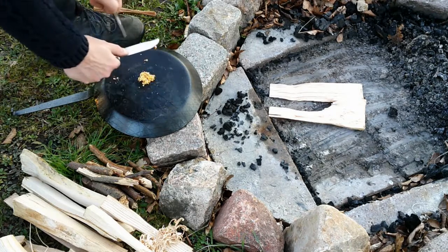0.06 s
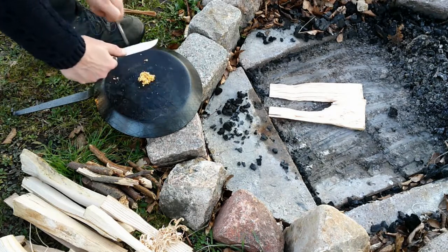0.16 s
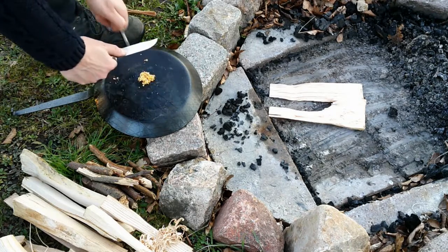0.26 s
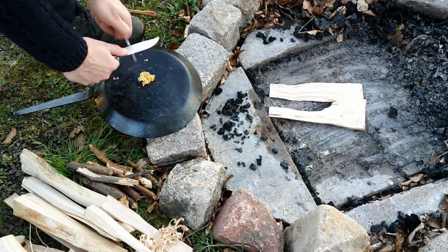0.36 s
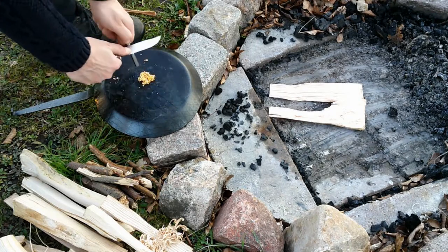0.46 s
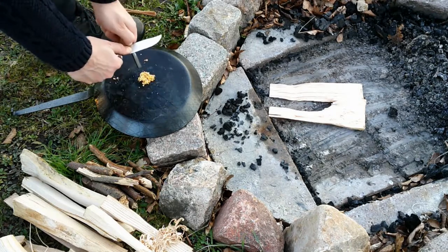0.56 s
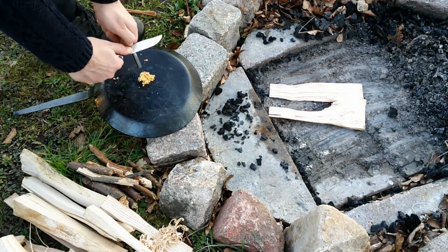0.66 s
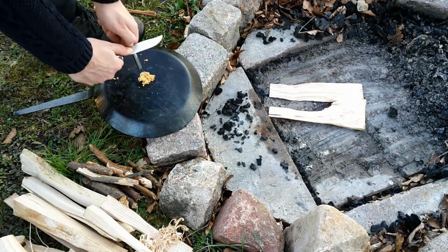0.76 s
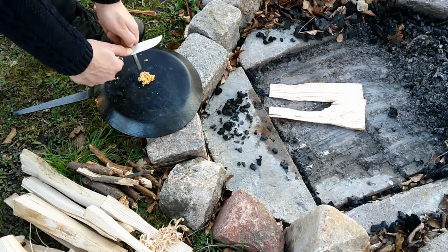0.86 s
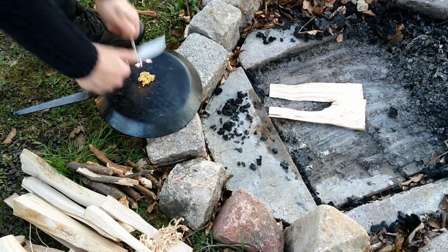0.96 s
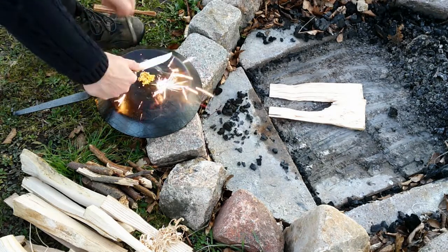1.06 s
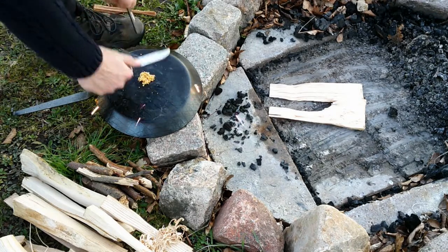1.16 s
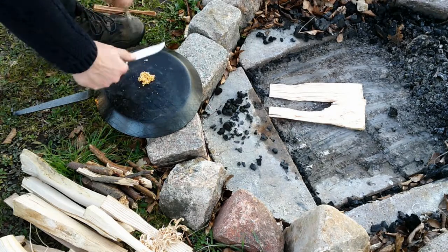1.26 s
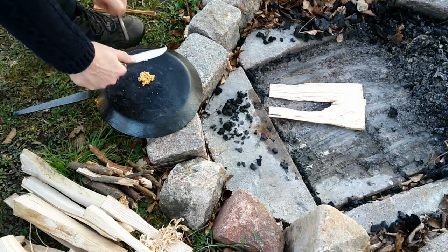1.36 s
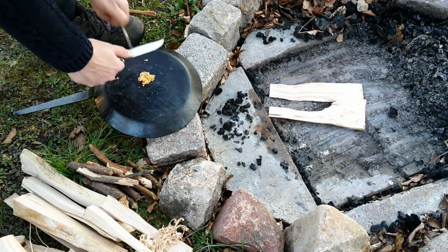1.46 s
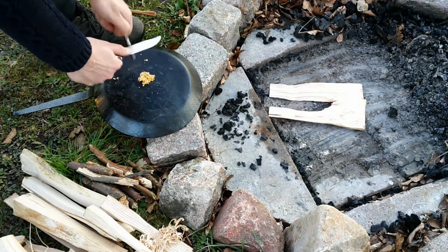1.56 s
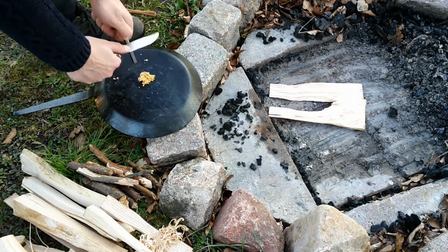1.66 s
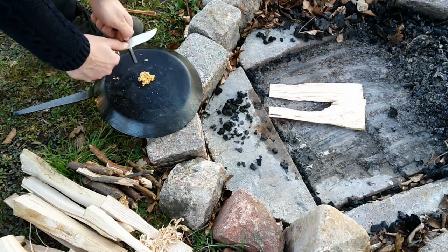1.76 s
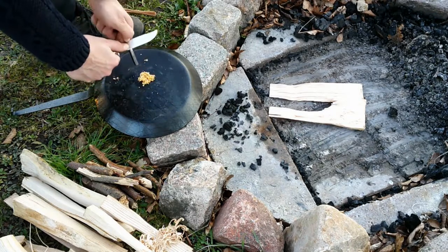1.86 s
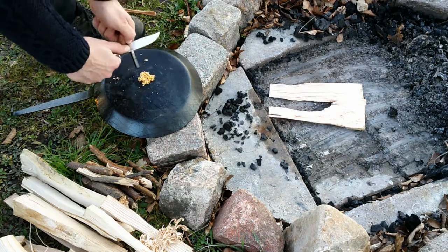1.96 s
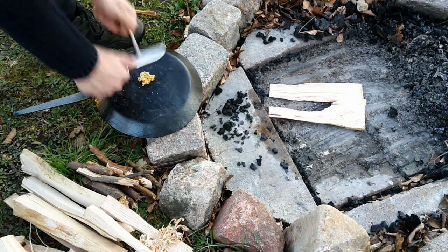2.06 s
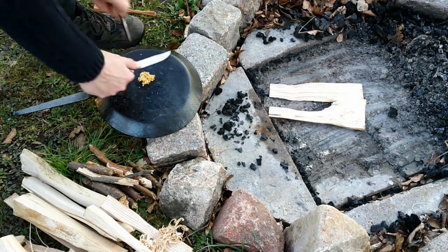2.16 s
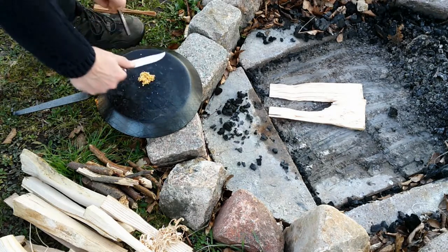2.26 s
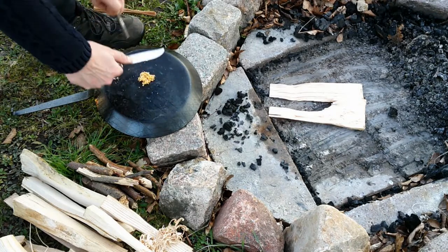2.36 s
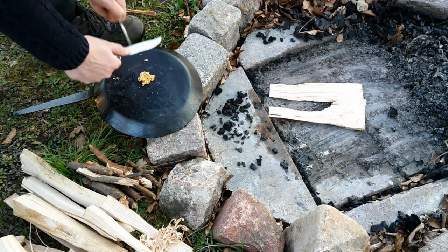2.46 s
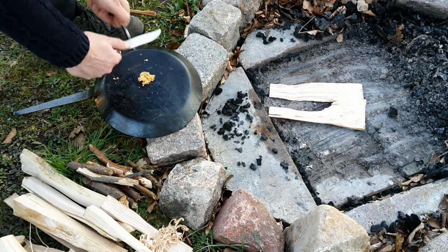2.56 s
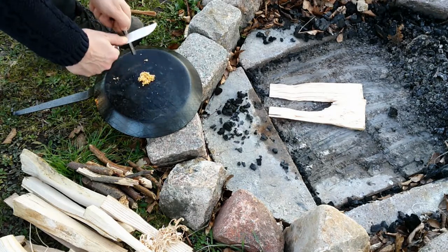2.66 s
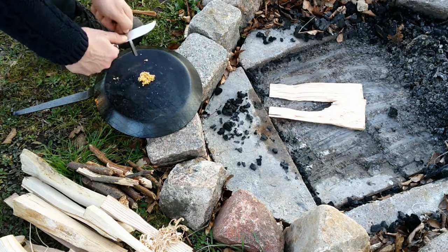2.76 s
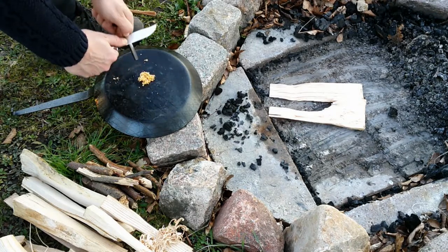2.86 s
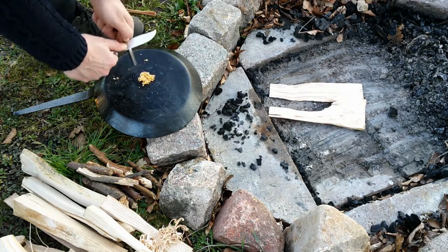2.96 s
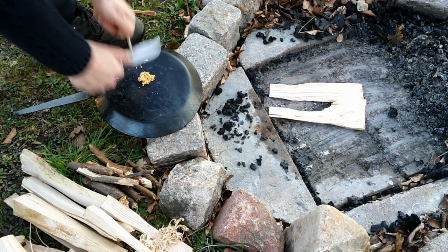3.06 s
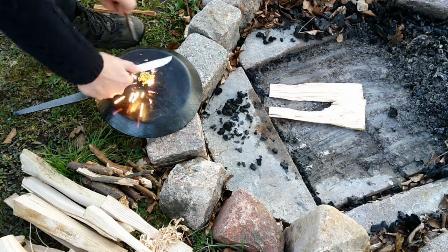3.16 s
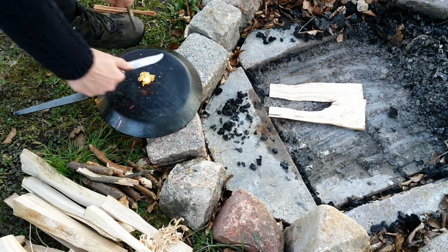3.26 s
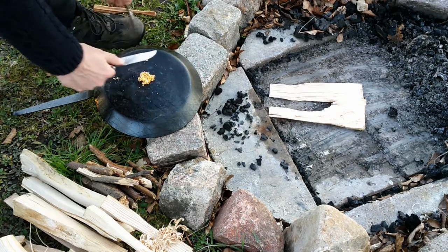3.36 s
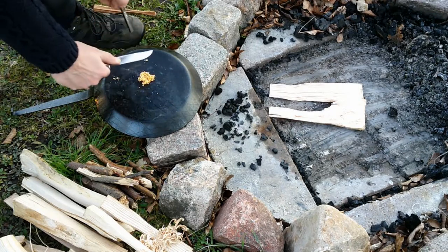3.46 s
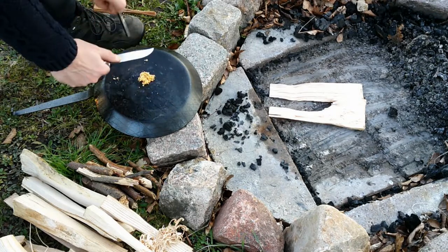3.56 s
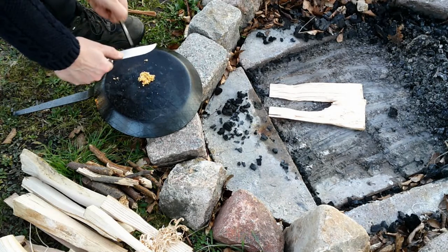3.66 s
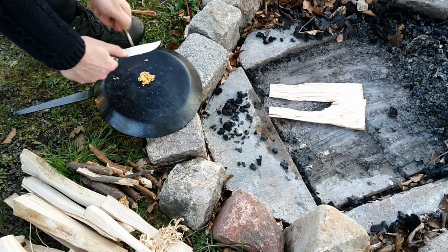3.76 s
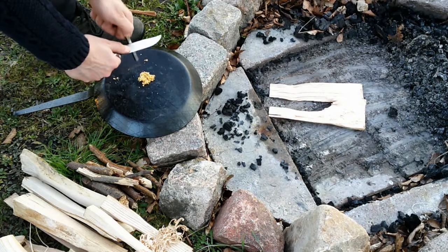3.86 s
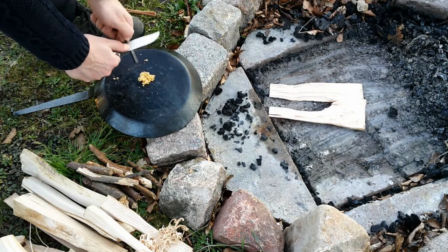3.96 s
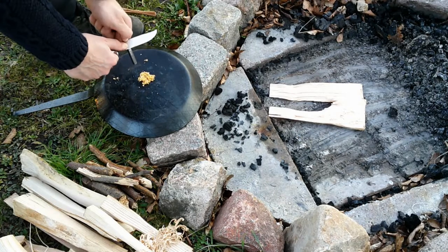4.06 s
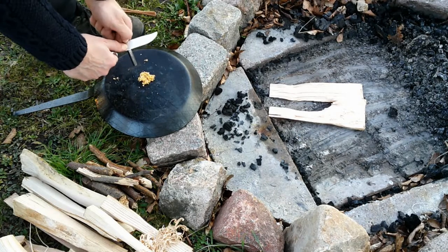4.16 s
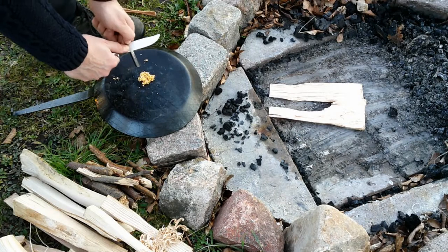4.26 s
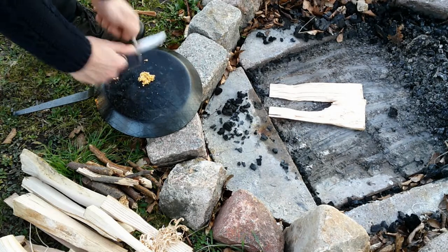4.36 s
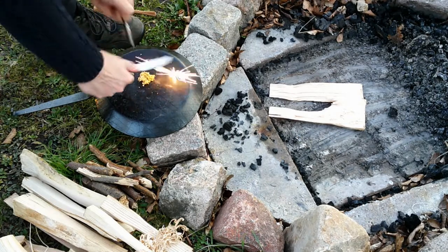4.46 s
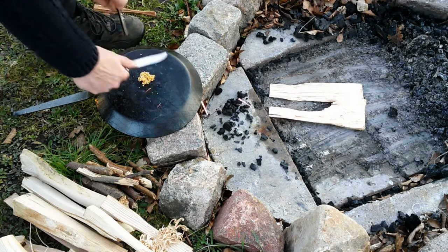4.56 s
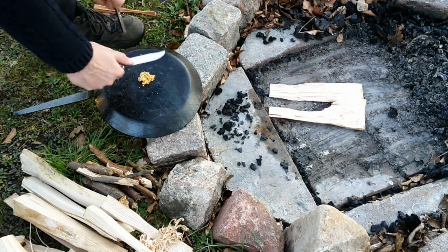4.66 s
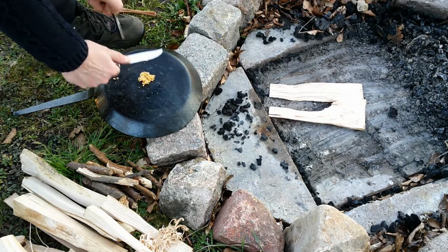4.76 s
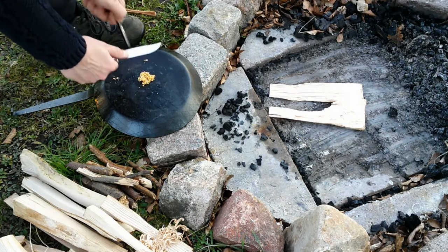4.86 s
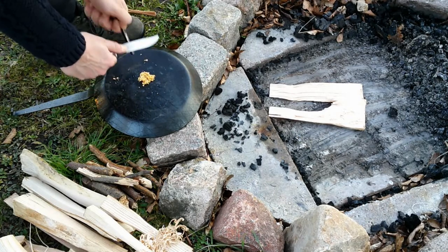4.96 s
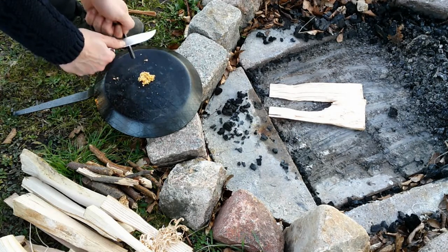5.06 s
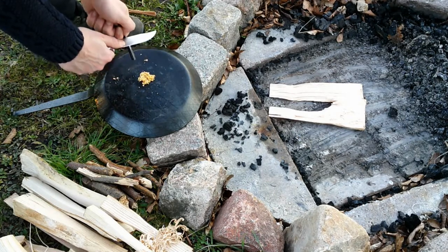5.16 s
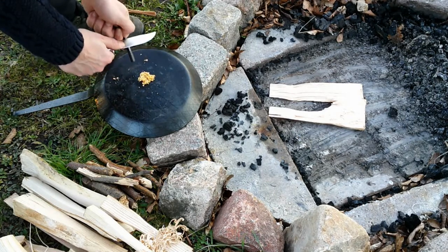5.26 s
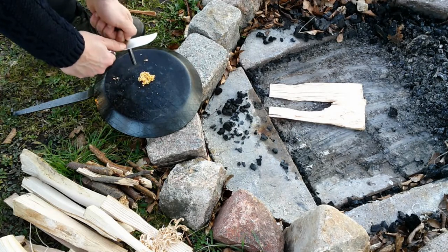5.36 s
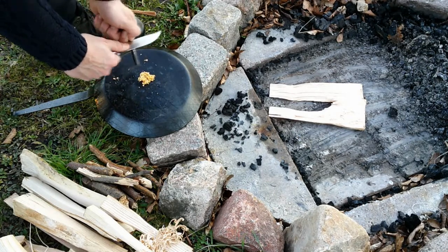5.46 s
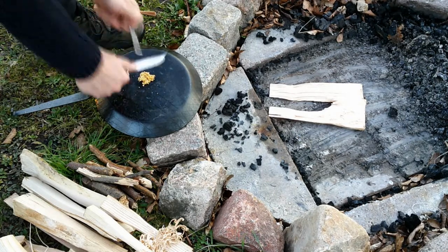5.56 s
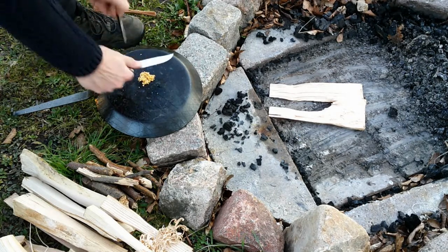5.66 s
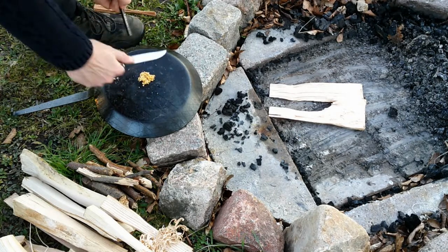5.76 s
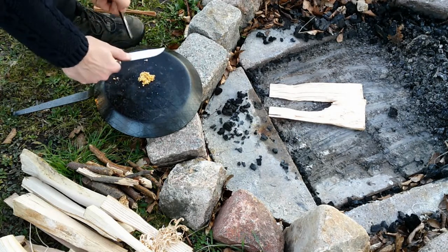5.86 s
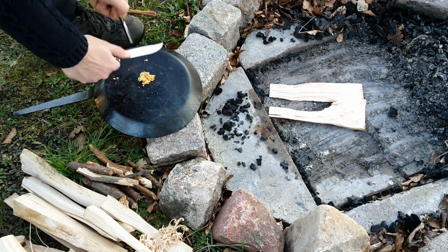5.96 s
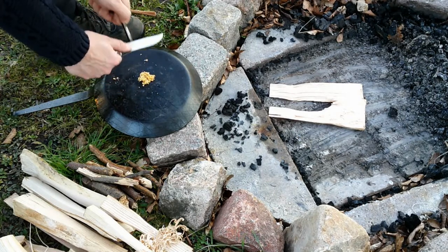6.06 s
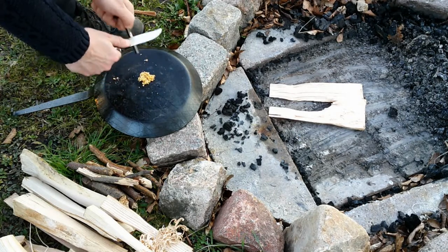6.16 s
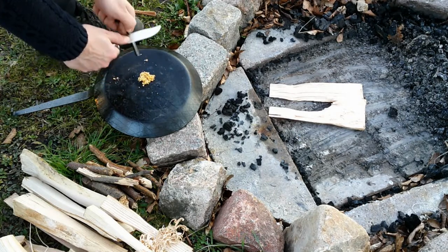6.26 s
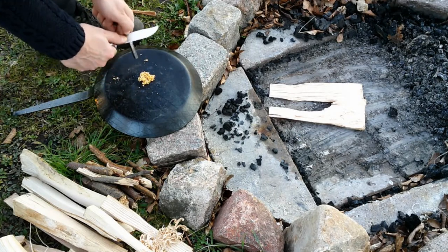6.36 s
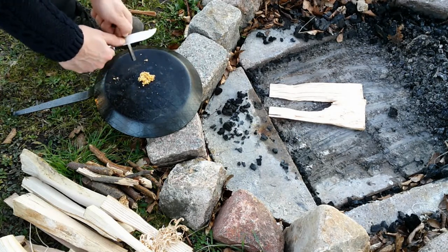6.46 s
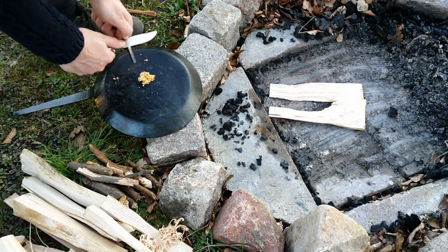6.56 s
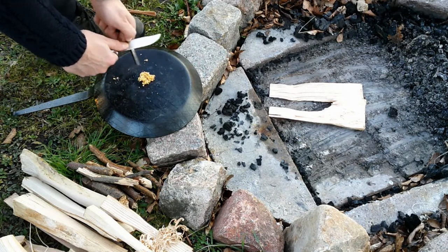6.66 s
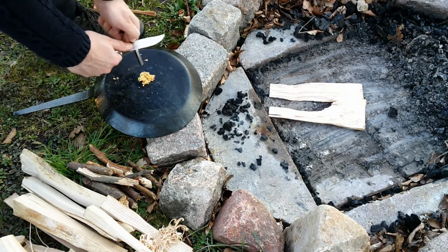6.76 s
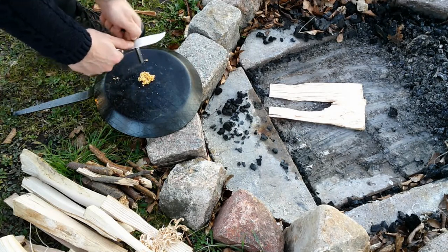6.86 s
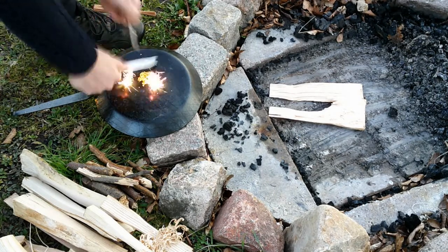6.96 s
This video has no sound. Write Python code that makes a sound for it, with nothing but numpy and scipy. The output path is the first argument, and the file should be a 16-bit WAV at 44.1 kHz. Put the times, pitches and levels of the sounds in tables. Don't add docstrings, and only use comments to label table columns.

```python
import sys
import numpy as np
from scipy import signal
from scipy.fft import rfft, irfft, next_fast_len
from scipy.io import wavfile
from scipy.ndimage import uniform_filter1d, map_coordinates

SR = 44100
rng = np.random.default_rng(int(sys.argv[2]) if len(sys.argv) > 2 else 0)


def waveform_to_disk(signal):
    frames = np.transpose(np.atleast_2d(signal))
    scaled = np.clip(frames, -1, 1) * 32767
    samples = np.round(scaled).astype(np.int16)
    wavfile.write(sys.argv[1], SR, samples)


def amplitude_ratio(level_db):
    exponent = np.asarray(level_db, float) / 20
    return 10 ** exponent


N = 309582

# (time [s], rise [s], length [s], peak level [dB], bright level [dB])
BITES = [(0.964, 0.0029, 0.02, -33, -5.5), (0.969, 0.016, 0.037, -26, -5),
         (1.001, 0.0033, 0.0063, -41, 13.5), (2.057, .0024, .013, -26, 0.5),
         (2.063, 0.0076, 0.024, -17.5, 2.5), (3.075, 0.013, .021, -14, -7.5),
         (3.09, 0.0056, 0.018, -25.5, 5), (4.397, 0.0098, .032, -18, 3.5), (5.551, .014, 0.015, -14, -19),
         (5.561, 0.0095, 0.015, -21, 0), (6.937, 0.0097, .016, -20, -10.5), (6.946, .011, .025, -16, 3)]
# (time [s], length [s], peak level [dB])
CREEPS = [
    (.929, 0.031, -46.5),
    (2.021, 0.029, -46),
    (3.03, 0.054, -47.5),
    (4.354, 0.04, -50),
    (5.51, .037, -41.5),
    (6.903, 0.051, -40.5),
]
# (time [s], length [s], peak level [dB])
GRABS = [
    (2.048, 0.017, -31.5),
    (3.063, 0.033, -31.5),
    (4.389, 0.018, -32.5),
    (5.543, 0.018, -39.5),
]
# (time [s], deep level [dB], middle level [dB], upper level [dB], edge level [dB])
GRIP = [
    (1, 2.5, 1, 2.5, 6),
    (2.07, -9.5, 1, 3.5, 5),
    (3.1, -10.5, 1.5, -3, 0.5),
    (4.41, -5.5, -0.5, 2.5, 2),
    (5.56, -3, -3.5, -4.5, -2),
    (6.96, -4, 1, 1, 1.5),
]
# (frequency [Hz], width [Hz], level [dB])
DEEP_MODES = [(413, 27, -9.5), (577, 470, -10), (800, 510, -5.5), (1053, 228, 0.5), (1254, 118, 4)]
MIDDLE_MODES = [(1490, 280, -9), (1803, 83, 7.5), (1932, 155, -6.5)]
UPPER_MODES = [(2440, 420, -10), (2592, 73, 6.5), (2840, 44, -2.5), (3300, 390, -13.5), (3730, 180, -5),
               (4490, 130, -33.5)]
BRIGHT_MODES = [(5260, 100, -3.5), (5740, 420, -15.5), (6180, 350, -8.5), (7140, 500, -25.5)]
EDGE_MODES = [(8110, 195, -13.5)]
# (frequency [Hz], width [Hz], level [dB])
PAN_BANDS = [
    [(925, 520, 2.5)],
    [(2400, 910, -0.5), (3850, 460, -2)],
    [(5200, 730, -11.5), (6190, 900, 2), (7680, 1000, -9.5)],
]
# (time [s], peak level [dB], middle
# level [dB], bright level [dB])
TICKS = [(0.4384, -32.5, 1.5, -12), (0.963, -26, -15, -17), (0.9764, -21, -11, -10.5),
         (0.9844, -39, -9, -17), (1.6309, -32, -5, -0.5), (1.6674, -46, 9.5, -5), (1.6926, -44, -4.5, -6),
         (2.0689, -20, -7, -16), (2.6788, -26, -10, -12), (3.8872, -33, 1, -7), (4.3675, -46, 6, 1),
         (5.061, -34, 8, -6), (5.5564, -28, 21, -12), (6.167, -27.5, 1, -22)]
# (frequency [Hz], width [Hz], level [dB])
DRY_SNAP = [(1760, 660, 0), (2720, 1200, 1), (4000, 2200, -4), (6100, 2000, -6)]
# (time [s], length [s], peak level [dB], bright level [dB])
SPARKS = [(1.013, 0.029, -36, 1.5), (1.041, 0.015, -43.5, -4), (1.056, 0.022, -48, 4.5),
          (1.078, 0.02, -54.5, 0), (3.11, 0.032, -40, 1), (3.143, 0.023, -45, 4), (3.22, 0.05, -51, 2),
          (3.279, 0.01, -52.5, 2.5), (3.337, 0.012, -49, 3), (4.434, 0.018, -43.5, 3),
          (4.452, .022, -54, -13), (6.978, 0.065, -45.5, 0)]
# (time [s], peak level [dB], bright level [dB])
POPS = [
    (1.011, -38, 0),
    (3.23, -36, -7),
    (3.234, -45, -10),
    (3.243, -35.5, -10),
    (3.25, -34.5, -10),
    (4.471, -40, -20),
    (6.238, -37, -18),
]
# (time of lowest pitch [s], level [dB])
TRILL = [(.01, -52), (0.109, -52.5), (0.204, -54.5), (0.302, -56.5), (0.396, -57), (0.502, -55), (.6, -60),
         (5.248, -55), (5.334, -57), (5.426, -56.5), (5.52, -53.5), (5.612, -53), (5.705, -51),
         (5.802, -51.5), (5.896, -52), (5.994, -52.5), (6.089, -54), (6.189, -54)]
PHRASE_STARTS = [-.6, 5.247]
# (time from lowest pitch [s], height from low to top [0-1], level [dB])
HOOK = [(-.027, .72, -16), (-.018, .28, -7), (-.009, .05, -2), (0, 0, 0), (.01, .12, 0), (.02, .45, -1),
        (.031, .9, -2), (.038, 1.05, -13)]
# (time [s], length [s], start pitch [Hz], end pitch [Hz], level [dB])
CHIRPS = [(2.177, 0.018, 5300, 5070, -62), (2.426, .01, 5600, 5000, -57), (2.495, 0.026, 4160, 3490, -54),
          (2.515, .023, 4000, 3160, -54), (2.537, .012, 3750, 2920, -56), (2.615, .012, 3040, 3500, -63),
          (2.696, .015, 3300, 3720, -58), (2.721, 0.016, 3050, 3900, -58), (2.745, 0.024, 3470, 3850, -61),
          (2.777, .013, 3500, 3250, -58), (6.223, .0082, 4300, 3730, -53)]
# (time [s], length [s], level [dB])
DIPS = [(6.299, 0.012, -54), (6.403, 0.015, -51.5), (6.463, 0.013, -56), (6.526, .014, -57),
        (6.586, .013, -55.5), (6.666, .011, -54.5), (6.748, 0.01, -55), (6.81, 0.018, -54.5),
        (6.848, 0.018, -58), (6.88, .016, -58)]
RISES = [(6.33, .012, -57), (6.349, 0.021, -54), (6.378, .016, -56), (6.432, 0.017, -58),
         (6.494, 0.016, -58.5), (6.554, 0.023, -66), (6.781, .029, -63)]
# (time [s], length [s], start pitch [Hz], end pitch [Hz], level [dB])
WHISTLES = [
    (.15, .09, 2980, 3110, -65),
    (1.125, 0.077, 5160, 4950, -62),
    (1.562, 0.091, 5200, 4830, -56),
    (1.7, 0.067, 4880, 4865, -59),
    (1.86, 0.18, 1620, 1560, -67.5),
    (2.093, .038, 4270, 4170, -61),
    (4.07, 0.11, 4130, 4130, -74),
]
# (time [s], level [dB])
THIN_NOTES = [(2.54, -65.5), (3.021, -58), (3.463, -63), (3.943, -62.5), (4.446, -64.5)]
LOW_NOTES = [(2.345, -65), (2.819, -61.5), (3.27, -65.5), (3.745, -67), (4.205, -64)]
# (time [s], length [s], level [dB], flick [Hz])
HIGH_NOTES = [
    (4.18, .128, -61.5, -32),
    (4.41, 0.15, -59, 170),
    (4.653, .168, -61, 400),
]
# (time [s], pitch [Hz], level [dB])
BENT_CALLS = [
    [(2.194, 5100, -61), (2.201, 4000, -51), (2.208, 4750, -65)],
    [(2.29, 4730, -63), (2.296, 3600, -56), (2.302, 4200, -65)],
    [(1.268, 3280, -64), (1.282, 3130, -53), (1.315, 3090, -56), (1.372, 3285, -53.5), (1.474, 3277, -55.5),
     (1.488, 3290, -67)],
    [(1.848, 3060, -58), (1.868, 3200, -55.5), (1.91, 3130, -57), (2.035, 3084, -58)],
    [(2.315, 4450, -64), (2.328, 4880, -58), (2.345, 4980, -53), (2.372, 4740, -57)],
    [(2.434, 5200, -56), (2.45, 4740, -52.5), (2.478, 4620, -55.5), (2.497, 3800, -53)],
    [(6.25, 2690, -63), (6.31, 2930, -65), (6.393, 3070, -64), (6.43, 2910, -67)],
    [(6.585, 2680, -63), (6.619, 2990, -61), (6.675, 3080, -74)],
]
# (time [s], pitch [Hz], level [dB])
ARCH = [
    [(4.945, 5280, -66), (4.975, 5380, -57), (5.03, 5490, -58), (5.065, 5480, -63), (5.15, 5500, -62),
     (5.18, 5170, -60), (5.23, 5050, -67)],
    [(5.185, 5450, -66), (5.23, 5350, -68)],
]
# (frequency [Hz], time to fall 60 dB [s])
TREES = [(1000, 0.41), (4000, 0.66), (8000, 0.56)]
# (frequency [Hz], density [dB per Hz])
AIR = [(12, -42.5), (20, -6.5), (164, 0.5), (340, -6.5), (739, -8), (999, -8), (1080, -9), (1380, -11),
       (1970, -12.5), (2280, -13), (2650, -14.5), (3500, -18.5), (5360, -25.5), (6550, -20.5),
       (8000, -23.5), (10400, -58), (17600, -120)]
# (frequency [Hz], level [dB])
MIRROR = [(7400, -0.5), (8000, -1), (8500, -15.5), (9000, -34.5)]
CAMERA_HZ, TOP_HZ = 16000, 9040


def scrape():
    when, deep_db, *grip_db = np.transpose(GRIP)
    middle_grip, upper_grip, edge_grip = (amplitude_ratio(np.interp(np.arange(N) / SR, when, db)) for db in grip_db)
    rubs = [(s, length, length, db, 6.5, 0) for s, length, db in CREEPS]
    rubs += [(s, 0.44 * length, length, db, -4.5, 10) for s, length, db in GRABS]
    rubs += [(*bite, np.interp(bite[0], when, deep_db)) for bite in BITES]
    deep, middle, bright = amplitude_ratio(10.5) * pressure(rubs)

    slip_share = 0.7
    jolts = slips()
    grit = slip_share * jolts + np.sqrt(1 - slip_share ** 2) * chips(rows=5)
    forces = grit * [deep, middle * middle_grip, middle * upper_grip, bright, bright * edge_grip]
    crack = amplitude_ratio(-8) * jolts * [amplitude_ratio(-8.5) * deep, middle * upper_grip, amplitude_ratio(-10.5) * bright]
    return steel(forces, damping=1.4) + pan(crack)


def slips():
    luck = rng.random((2, int(N / SR * 500)))
    gaps = (0.4 + 1.2 * luck[0]) * SR / 420
    at = np.cumsum(gaps).astype(int)
    inside = at < N
    jolts = np.zeros(N)
    jolts[at[inside]] = (0.79 + luck[1])[inside]
    return unit(jolts)


def chips(rows):
    happens, side, size = rng.random((3, rows, N))
    hits = (happens < 8000 / SR) * np.sign(side - 0.5) * amplitude_ratio(-3.5 * np.log(size + 0.01))
    return hits / np.sqrt(uniform_filter1d(hits ** 2, size=160, axis=1) + 0.013)


def pressure(rows):
    t, press = np.arange(N) / SR, np.zeros((3, N))
    for s, rise, length, db, bright_db, deep_db in rows:
        rise = np.clip(rise, 0.001, length - 0.003)
        corners = [0, rise, length - 0.002, length]
        shape = np.interp(t - s, corners, [0.00023, 0.85, 0.32, 0.000043]) ** 1.095
        press += amplitude_ratio(db + np.array([[deep_db], [0], [bright_db]])) * shape
    return press


def steel(forces, damping=1):
    def low_cut(hz):
        return (1j * hz / 400) ** 2 / (1 + 1j * hz / 400) ** 2

    ring = 0
    for force, group in zip(forces, (DEEP_MODES, MIDDLE_MODES, UPPER_MODES, BRIGHT_MODES, EDGE_MODES)):
        damped = [(hz, damping * width, db) for hz, width, db in group]
        ring = ring + filtered(force, modes(damped))
    return filtered(ring, low_cut)


def pan(forces):
    return sum(filtered(force, modes(band)) for force, band in zip(forces, PAN_BANDS))


def ticks():
    forces, t = np.zeros((5, N + SR)), np.arange(600) / SR
    for s, db, middle_db, bright_db in TICKS:
        blow = 0.11 * rng.standard_normal((5, len(t))) * amplitude_ratio(-60 * t / 0.03)
        blow[:, 0] = 1
        bounce = round(SR * rng.uniform(0.0015, 0.0035))
        blow[:, bounce] = 0.23
        share_db = np.array([[-10], [middle_db + 7], [0], [bright_db + 15.5], [bright_db + 7.5]])
        forces[:, round(s * SR):][:, :len(t)] += amplitude_ratio(db + 16 + share_db) * blow
    ring = steel(forces[:, :N])
    snap = filtered(forces[2, :N], modes(DRY_SNAP))
    return amplitude_ratio(-3.5) * ring + amplitude_ratio(1) * snap


def sparks():
    sizzles = [(s, 0.0062, length, db, bright_db, 3.5) for s, length, db, bright_db in SPARKS]
    forces = amplitude_ratio(6) * pressure(sizzles) * chips(rows=1)
    for s, db, bright_db in POPS:
        forces[:, round(s * SR)] += amplitude_ratio(db + 14.5 + np.array([0, 0, bright_db + 12.5]))
    return pan(forces)


def birds():
    song, buzzy = np.zeros((2, N))
    for note in trill() + chirps() + whistles() + BENT_CALLS:
        sing(song, note)
    for note in ARCH:
        sing(buzzy, note)
    return song * amplitude_ratio(2.2 * wobble(600)) + buzzy * amplitude_ratio(4 * wobble(170) - 2)


def trill():
    notes = []
    for s, db in TRILL:
        age = s - max(start for start in PHRASE_STARTS if start <= s + 0.02)
        low = 4080 + 424 * np.exp(-age / 0.17)
        top = 4750 + 268 * np.exp(-age / 0.45)
        pace = np.minimum((top - low) / 680, 1)
        notes.append([(s + pace * dt, low + height * (top - low), db + fall) for dt, height, fall in HOOK])
    return notes


def chirps():
    rows = [(s, length, db, a, a + 0.71 * (b - a), b) for s, length, a, b, db in CHIRPS]
    rows += [(*dip, 4270, 3790, 4130) for dip in DIPS]
    rows += [(*rise, 3540, 3900, 4180) for rise in RISES]
    return [[(s, a, db - 4), (s + length / 2, b, db), (s + length, c, db - 7)]
            for s, length, db, a, b, c in rows]


def whistles():
    attack_s, release_s, fade_db = 0.014, 0.016, -4.5
    rows = WHISTLES + [(s, 0.085, 4200, 4157, db) for s, db in THIN_NOTES]
    rows += [(s, 0.088, 3130, 3000, db) for s, db in LOW_NOTES]
    notes = []
    for s, length, a, b, db in rows:
        end = s + length
        notes.append([(s, a, db + fade_db), (s + attack_s, a, db), (end - release_s, b, db), (end, b, db + fade_db)])

    high_hz, scoop_s, flick_s = 7200, 0.011, 0.0375
    for s, length, db, flick in HIGH_NOTES:
        end = s + length
        scoop = [(s, high_hz - 1110, db - 2), (s + scoop_s, high_hz - 100, db + 4.5)]
        hold = [(s + 3 * scoop_s, high_hz + 40, db - 3), (end - flick_s, high_hz - 30, db)]
        last = [(end - release_s / 2, high_hz + 0.7 * flick, db), (end, high_hz + flick, db + fade_db)]
        notes.append(scoop + hold + last)
    return notes


def sing(track, note):
    s, hz, db = np.transpose(note)
    n = np.arange(max(round(s[0] * SR), 0), min(round(s[-1] * SR), N))
    t = n / SR
    hz, db = (uniform_filter1d(np.interp(t, s, v), size=130, mode="nearest") for v in (hz, db))
    ends = np.clip(np.minimum(t - s[0], s[-1] - t) / 0.0016, 0, 1)
    track[n] += np.sqrt(2) * amplitude_ratio(db) * ends * np.sin(2 * np.pi * np.cumsum(hz) / SR)


def trees(x, late_db=-14, late_t60=3.0):
    hz, t, z = signal.stft(rng.standard_normal(SR // 2), SR, nperseg=256)
    leaves = amplitude_ratio(-60 * t / along(TREES, hz)[:, None])
    tree_lines = amplitude_ratio(late_db - 60 * t / late_t60)
    tail = signal.istft(z * (leaves + tree_lines), SR, nperseg=256)[1]
    delayed = np.pad(x, (500, 0))
    return signal.fftconvolve(delayed, tail / np.linalg.norm(tail))[:N]


def air():
    z = signal.stft(rng.standard_normal(N + 512), nperseg=512)[2]
    patches = uniform_filter1d(rng.standard_normal(z.shape), 6, 0)
    patches = unit(uniform_filter1d(patches, 14, 1))
    noise = signal.istft(z * amplitude_ratio(1 * patches), nperseg=512)[1][:N]
    noise = filtered(noise, lambda hz: amplitude_ratio(along(AIR, np.minimum(hz, CAMERA_HZ / 2))) * (hz < TOP_HZ))
    return amplitude_ratio(-55 + 0.36 * wobble(30000)) * unit(noise)


def wobble(step):
    return map_coordinates(rng.standard_normal(N // step + 4), [np.arange(N) / step])


def modes(table):
    def response(f):
        total = 0
        for k, (hz, width, db) in enumerate(table):
            total = total + (-1) ** k * amplitude_ratio(db) * 1j * f * width / (hz * hz - f * f + 1j * f * width)
        return total
    return response


def filtered(x, response):
    m = next_fast_len(N + SR // 2)
    return irfft(rfft(x, m) * response(np.fft.rfftfreq(m, 1 / SR)), m)[..., :N]


def along(points, hz):
    f, v = np.transpose(points)
    return np.interp(np.log(hz + 1), np.log(f + 1), v)


def unit(x):
    return x / np.sqrt(np.mean(x ** 2) + 1e-20)


def scene():
    near = scrape() + ticks() + sparks()
    far = birds()
    near_answer = amplitude_ratio(-30.5) * trees(near, late_db=-31)
    far_answer = amplitude_ratio(-9.5) * trees(far)
    return (near + near_answer + far + far_answer + air())[None]


def band_limit(x):
    return signal.sosfilt(signal.butter(12, 9040, fs=SR, output="sos"), x)


def record(dry):
    band = filtered(dry, lambda hz: np.clip(0.5 + (CAMERA_HZ / 2 - hz) / 500, 0, 1))
    mirrored = band * (1 + 2 * np.cos(2 * np.pi * CAMERA_HZ * np.arange(N) / SR))
    mix = filtered(mirrored, lambda hz: amplitude_ratio(along(MIRROR, hz)) * np.clip((TOP_HZ - hz) / 60, 0, 1))
    return band_limit(mix)


dry = scene()
out = record(dry)
waveform_to_disk(out)
```